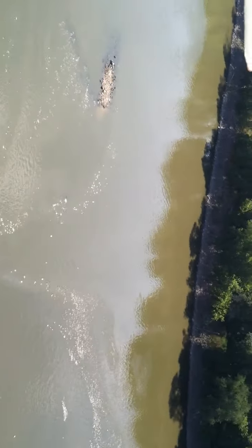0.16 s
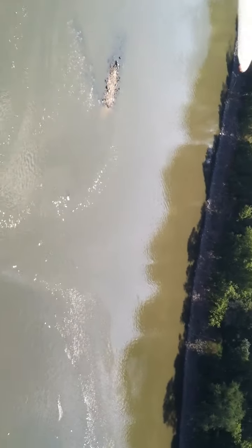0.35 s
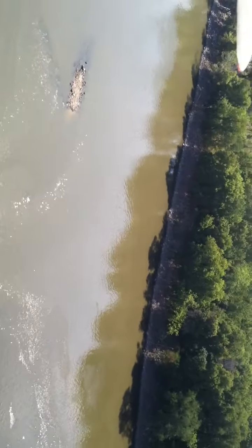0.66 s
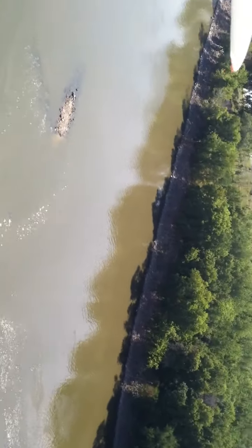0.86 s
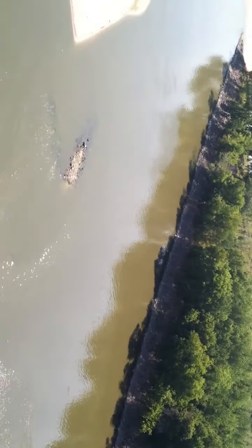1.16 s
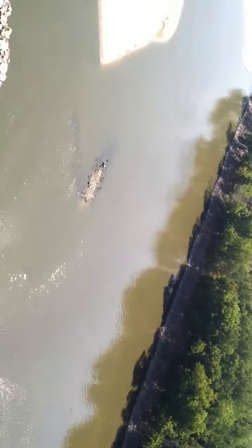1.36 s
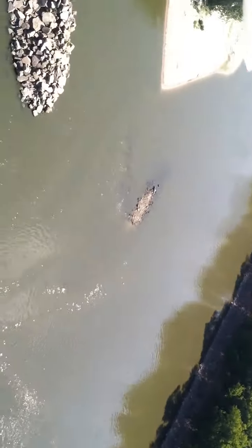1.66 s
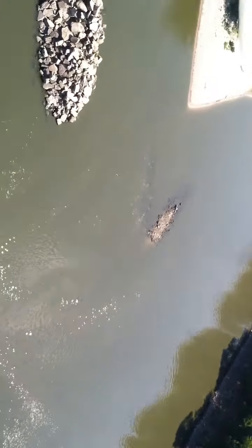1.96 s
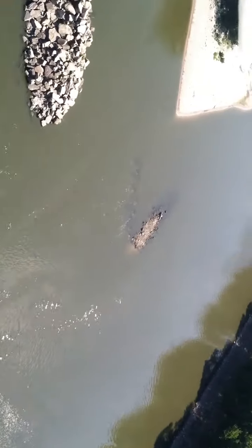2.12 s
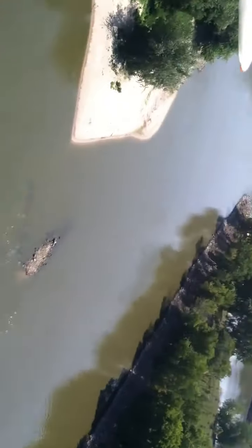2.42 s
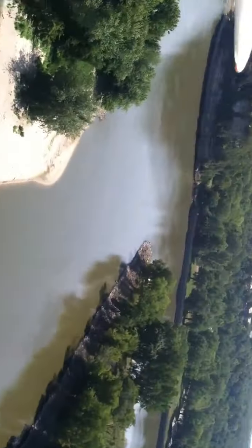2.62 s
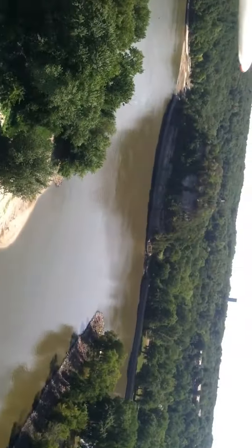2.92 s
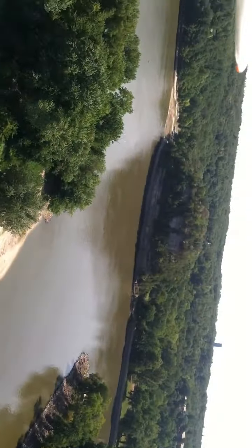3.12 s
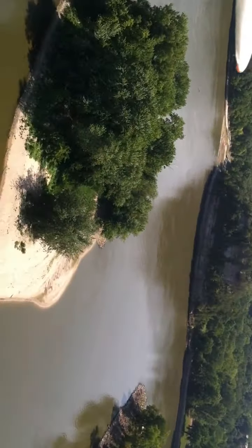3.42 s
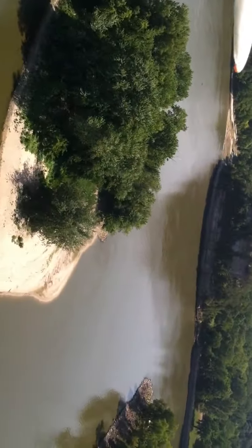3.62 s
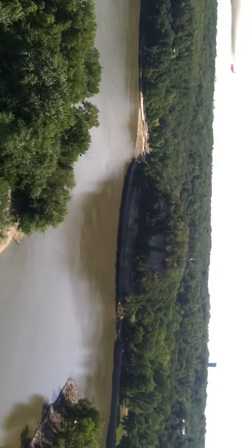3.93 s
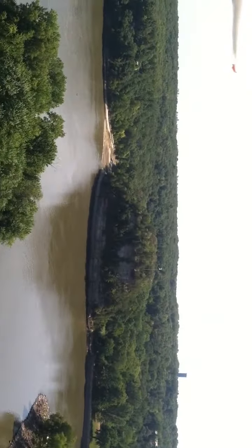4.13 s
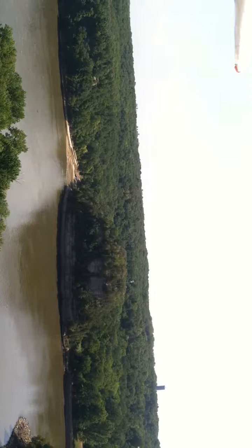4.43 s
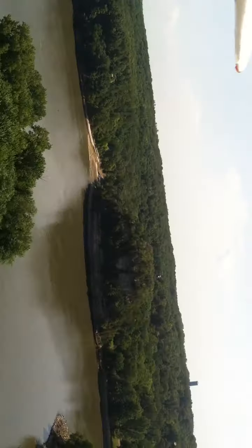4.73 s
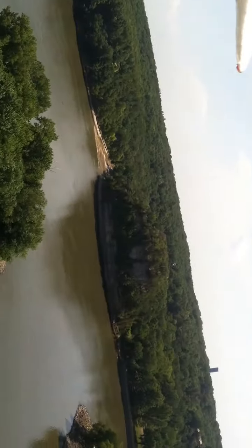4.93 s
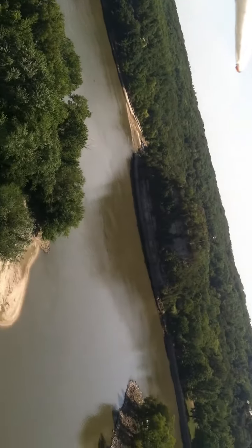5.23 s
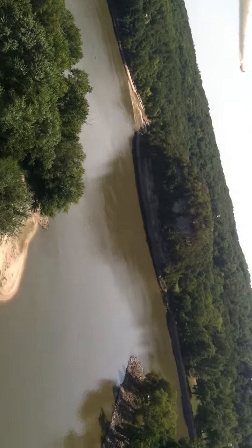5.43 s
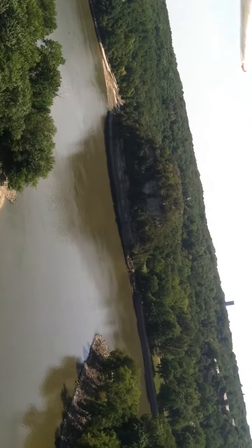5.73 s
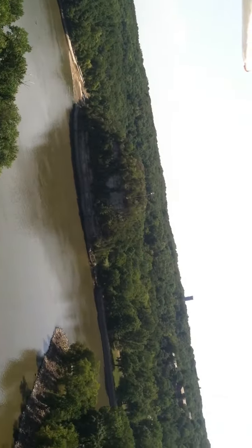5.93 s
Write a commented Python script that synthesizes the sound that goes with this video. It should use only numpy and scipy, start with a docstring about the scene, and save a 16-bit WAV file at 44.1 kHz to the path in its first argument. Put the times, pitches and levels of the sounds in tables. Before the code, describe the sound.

Close to the microphone on a small model glider high over a river, wind roars, flutters and crackles with hard thumps and snaps. A nearby servo begins a rapid, regular ticking buzz with thin gear whirr. The wind gradually calms, then the ticking stops and returns in short bursts with brief whirrs as gusts build again.

```python
"""Air tears past a microphone port on a small model glider: large eddies roar, small ones flutter.
Frozen noise patterns sweep by at an uneven speed; single strong eddies thump and snap.
A control servo nearby answers about 45 command pulses a second with little clicks rung by the case.
Its gears whirr and whine, more when it moves, over the thin hiss of the slipstream.
The microphone cuts the bass, rounds off the peaks and passes nothing above the band limit."""
import sys
import numpy as np
from scipy import signal
from scipy.fft import rfft, irfft, next_fast_len
from scipy.io import wavfile
from scipy.ndimage import map_coordinates

SR = 44100
rng = np.random.default_rng(int(sys.argv[2]) if len(sys.argv) > 2 else 0)


def wav_record(signal):
    """Record a signal, one row per channel, as 16-bit PCM in the file named by sys.argv[1]."""
    frames = np.transpose(np.atleast_2d(signal))
    bounded = np.clip(frames, -1, 1)
    # unit amplitude maps onto the largest positive 16-bit level
    quanta = np.round(bounded * 32767).astype(np.int16)
    wavfile.write(sys.argv[1], SR, quanta)


N = 267755

LOAD_ON_S, EASE_S, LOAD_OFF_S = .78, 2.34, 4.28  # the servo takes a load, eases, lets go


def amp(db):
    """Gain of a level in dB."""
    return 10 ** (np.asarray(db) / 20)


def unit(x):
    """Scaled to rms 1."""
    return x / np.sqrt(np.mean(x ** 2) + 1e-20)


def curves(rows, s):
    """Each column after the time, read at the times s."""
    t, *columns = np.transpose(rows)
    return [np.interp(s, t, column) for column in columns]


def wobble(rate):
    """A smooth random curve, rate knots a second."""
    knots = rng.standard_normal(int(N * rate / SR) + 4)
    return map_coordinates(knots, [np.arange(N) * rate / SR])


def coloured(x, points):
    """x through a causal minimum-phase filter with the (Hz, dB) points as its gain."""
    m = 2 * next_fast_len(len(x) // 2 + 4096)
    hz, db = np.transpose(points)
    gain_db = np.interp(np.log(np.fft.rfftfreq(m, 1 / SR) + 1), np.log(hz + 1), db)
    # folding the cepstrum onto positive time makes the filter causal
    cepstrum = irfft(np.log(amp(gain_db)), m)
    cepstrum[1:m // 2] *= 2
    cepstrum[m // 2 + 1:] = 0
    return irfft(rfft(x, m) * np.exp(rfft(cepstrum)), m)[:len(x)]


# Colour of the slipstream hiss. Each row: frequency in Hz, relative level in dB per Hz.
HISS_COLOUR = [(800, 3), (2000, 12), (3500, 0.5), (6000, -6), (9000, -8.5), (11500, -15.5), (13500, -24),
               (15500, -49)]


def slipstream():
    """The thin hiss of the slipstream: coloured noise that follows its level curve unevenly."""
    hiss_db = curves(AIRFLOW, np.arange(N) / SR)[2]
    hiss = unit(coloured(rng.standard_normal(N), HISS_COLOUR))
    return amp(hiss_db + 0.93 * wobble(40)) * hiss


# Case resonances that colour the gear whirr. Each row: frequency in Hz, relative level in dB per Hz.
WHIRR_COLOUR = [(1500, -26), (2600, -12), (3900, -3.5), (4700, -2), (5300, -10.5), (6200, -13.5),
                (7250, -14.5), (8450, -16), (10000, -23.5), (12500, -27), (15000, -62.5)]
# Narrow whine of the gears. Each row: frequency in Hz, relative level in dB per Hz.
WHINE_COLOUR = [(6500, -39), (7300, -13), (7700, -1), (8000, 1), (8400, -9), (9200, -37)]
# The servo travels and its gears spin up.
# Each row: middle in seconds, half length in seconds, whirr level in dB, whine level in dB.
SERVO_MOVES = [(0.807, 0.027, -58, -70), (2.03, 0.054, -54.5, -67), (2.368, 0.073, -54.5, -70),
               (2.67, .029, -52, -65), (2.808, 0.037, -63, -69), (2.957, 0.043, -57, -65),
               (3.206, 0.049, -51, -60), (3.432, 0.024, -54, -65), (3.68, 0.037, -52, -66),
               (4.49, 0.028, -41, -62), (4.758, 0.045, -66, -70), (4.938, 0.041, -55, -66),
               (5.127, .027, -50, -73), (5.339, 0.036, -41, -58), (5.452, 0.028, -46, -58),
               (5.663, 0.03, -56, -65), (5.89, .03, -62, -69), (6.043, .025, -56, -66)]
WHIRR_DB, IDLE_DB = -58.5, -64.5  # steady whirr until the load is let go, and after it
WHIRR_SAG_DB_PER_S = 1  # the whirr sinks from the easing until the load is let go
WHINE_DB = -13.5  # steady whine against the steady whirr
TOOTH_HZ, TOOTH_DB = 400, 10  # typical tooth contacts a second; how far each contact stands out


def gears():
    """Gear teeth whirr in the case's resonances, and a narrow whine rides on them."""
    t = np.arange(N) / SR
    loaded_db = WHIRR_DB - WHIRR_SAG_DB_PER_S * np.clip(t - EASE_S, 0, None)
    whirr_db = np.where(t < LOAD_OFF_S, loaded_db, IDLE_DB)
    whirr_gain, whine_gain = amp(whirr_db), amp(whirr_db + WHINE_DB)
    for s, half_s, move_whirr_db, move_whine_db in SERVO_MOVES:
        whirr_gain = whirr_gain + amp(move_whirr_db) * np.exp(-((t - s) / half_s) ** 2)
        # the whine swells and fades more slowly than the whirr
        whine_gain = whine_gain + amp(move_whine_db) * np.exp(-((t - s) / (1.4 * half_s)) ** 2)
    whine = unit(coloured(rng.standard_normal(N) * amp(3.5 * wobble(90)), WHINE_COLOUR))
    mesh = np.cos(2 * np.pi * np.cumsum(TOOTH_HZ * amp(1.7 * wobble(30))) / SR)
    contact = amp(TOOTH_DB * mesh + 1.5 * wobble(150))
    teeth = unit(coloured(rng.standard_normal(N) * contact, WHIRR_COLOUR))
    return whirr_gain * teeth + whine_gain * whine


# The servo holds a load. Each row: time in seconds, stop click level in dB,
# start click level in dB against the stop, drive pulse length in ms.
HELD_LOAD = [(.78, -35, -2, 1), (1.15, -32, -2, 1.05), (1.45, -31, -3, 2.05), (2.3, -31, -3, 2.05),
             (2.5, -31, -3, 1.9), (4.28, -27, -3, 1.9)]
FRAME_S = .021996  # from one command pulse to the next
DELAY_S, EARLY_S = .00635, .0002  # stop click after the frame start; how early it stops at first
SKIP_DB, SKIP_END_S = -9, 4.2  # from EASE_S to here every second frame is weak


def held_clicks():
    """Stop times, lateness, stop levels, start levels and pulse lengths while the motor holds the load."""
    frame = np.arange(round(LOAD_ON_S / FRAME_S), round(LOAD_OFF_S / FRAME_S))
    frame_s = frame * FRAME_S
    stop_db, start_db, pulse_ms = curves(HELD_LOAD, frame_s)
    chance = rng.standard_normal((len(frame), 3))
    # the skipped frames vary the most, and all are uneven until the load settles
    skip_db = SKIP_DB * (frame_s > EASE_S) * (frame_s < SKIP_END_S) * (frame % 2)
    skip_db = skip_db * np.clip(1 + .4 * chance[:, 0], .3, 2)
    uneven_db = .8 + 3 * np.exp((LOAD_ON_S - frame_s) / .6)
    db = stop_db + skip_db + uneven_db * chance[:, 1]
    # the first pulses are the shortest and stop early
    s = frame_s + DELAY_S - EARLY_S * np.exp((LOAD_ON_S - frame_s) / .4)
    late_s = .00007 * chance[:, 2]
    return s, late_s, db, start_db, pulse_ms


# Short bursts of drive pulses once the load is off.
# Each row: rough stop time in seconds, stop click level in dB.
TWITCH_PULSES = [(4.4523, -40), (4.4703, -22), (4.5576, -21.5), (4.5801, -19), (4.624, -24), (4.8874, -21),
                 (4.9103, -24.5), (4.9323, -22.5), (4.9542, -23.5), (5.0206, -20.5), (5.042, -22.5),
                 (5.0635, -25), (5.0859, -23.5), (5.1079, -23.5), (5.2625, -23), (5.285, -23.5),
                 (5.3069, -21), (5.3299, -20.5), (5.3508, -20.5), (5.4162, -25), (5.4381, -25),
                 (5.4601, -23), (5.481, -21.5), (5.503, -20), (5.5249, -20.5), (5.6367, -24), (5.6581, -23),
                 (5.6801, -21.5), (5.7245, -20.5), (5.7449, -23), (5.7903, -22), (5.8781, -25),
                 (5.922, -22), (6.0323, -21.5)]
LOOSE_MS = .7, 1.9  # shortest and longest twitch pulse


def twitch_clicks():
    """The same for twitch pulses, which fall near the stop time of the nearest frame."""
    rough_s, db = np.transpose(TWITCH_PULSES)
    count = len(rough_s)
    s = np.round((rough_s - DELAY_S) / FRAME_S) * FRAME_S + DELAY_S
    s = s + .0002 * rng.standard_normal(count)
    start_db = -7 + 3 * rng.standard_normal(count)
    return s, np.zeros(count), db, start_db, rng.uniform(*LOOSE_MS, count)


# Faint stray ticks of the linkage. Each row: time in seconds, level in dB.
LINKAGE_TICKS = [(0.0268, -30), (0.051, -33), (0.212, -33), (0.282, -44), (0.4229, -33), (0.4936, -30),
                 (0.656, -31), (0.7512, -39)]
# Click through the airframe. Each row: frequency in Hz, gain in dB.
AIRFRAME = [(1200, -18), (2200, -5.5), (2900, -3.5), (3550, 3), (4700, 0), (5400, -10), (6400, -20.5),
            (7300, -18), (8200, -19), (10500, -24), (13000, -45.5)]
# Higher ring of a stop click. Each row: frequency in Hz, gain in dB.
STOP_RING = [(2500, -24.5), (4000, -11), (4750, 2), (5200, -5), (5650, -24), (8000, -21.5), (9500, -25),
             (12000, -38)]
EDGE_DB, EDGE_GROWS = -26.5, .75  # ring of the strongest stop; dB gained for each dB of the stop


def servo():
    """The motor clicks as a drive pulse starts and, harder, when it stops a millisecond or two later."""
    s, late_s, db, start_db, pulse_ms = map(np.concatenate, zip(held_clicks(), twitch_clicks()))
    # under load the end of a pulse wavers while its start does not
    stop = np.round((s + late_s) * SR).astype(int)
    start = np.round((s - pulse_ms / 1000) * SR).astype(int)
    kicks = np.zeros(N)
    np.add.at(kicks, stop, amp(db))
    np.add.at(kicks, start, amp(db + start_db))
    # each stop also rings a higher resonance, which weak stops keep most of
    edges = np.zeros(N)
    edge_db = EDGE_DB + EDGE_GROWS * (db - db.max()) + 1.5 * rng.standard_normal(len(s))
    np.add.at(edges, stop, amp(edge_db))
    tick_s, tick_db = np.transpose(LINKAGE_TICKS)
    kicks[np.round(tick_s * SR).astype(int)] += amp(tick_db)
    # two short echoes inside the fuselage, and the gears rebound
    for lag_s, echo_db in [(.00065, -11), (.00155, -14), (.006, -22)]:
        kicks = kicks + amp(echo_db) * np.roll(kicks, round(lag_s * SR))
    # the gear train rattles on for a few milliseconds, so no two clicks ring alike
    fading = amp(-60 * np.arange(800) / SR / 0.0095)
    rattle = amp(-29) * np.convolve(kicks, fading)[:N] * rng.standard_normal(N)
    # the peak of one click through the airframe sets the scale
    crest = np.abs(coloured(np.arange(512) == 0, AIRFRAME)).max()
    return (coloured(kicks + rattle, AIRFRAME) + coloured(edges, STOP_RING)) / crest


def eddies(s, db, hz, cycles):
    """Each eddy is about one cycle of pressure under a pointed crest, mostly a suction."""
    t = np.arange(-300, 300) / SR
    turn = .5 + .15 * rng.standard_normal(len(s))[:, None]  # half a turn is pure suction
    phase = hz[:, None] * t
    shape = amp(db)[:, None] * np.cos(2 * np.pi * (phase + turn)) / np.cosh(phase / cycles)
    place = np.round(s * SR).astype(int)[:, None] + np.arange(600)
    return np.bincount(place.ravel(), shape.ravel(), N + 600)[300:N + 300]


# Single strong eddies, from thumps to snaps.
# Each row: time in seconds, crest level in dB before its random turn, pitch in Hz.
STRONG_EDDIES = [(0.0429, -3, 820), (.062, -7.5, 945), (.13, -11.5, 950), (.2045, -12, 1050),
                 (.234, -4, 950), (.26, -7, 1000), (.2867, -3.5, 1300), (0.3103, 0, 1170),
                 (.3162, -4.5, 1330), (.331, -11, 1010), (0.335, -15, 895), (.362, -5, 423),
                 (.39, -5.5, 1100), (0.3921, 0.5, 437), (.409, -8, 800), (.4296, -12, 940),
                 (.4358, -10, 895), (0.5119, -8, 980), (0.5153, -9.5, 1000), (.5271, -2, 464),
                 (.5353, -6, 1000), (.541, -9, 1210), (0.5638, -7, 1150), (.576, -5, 800), (.608, -10, 900),
                 (.614, -9, 900), (0.6352, -4.5, 1360), (0.6532, -3.5, 1160), (0.6562, 1.5, 587),
                 (.662, -8, 900), (.6849, -13, 900), (0.705, -3, 452), (0.7547, -6.5, 600),
                 (.7789, -13, 950), (0.724, -14.5, 1110), (.7832, -7, 890), (0.798, -15, 980),
                 (0.8331, -7, 1690), (0.8553, -4, 1150), (0.872, 0, 417), (0.9021, -3, 1060),
                 (.9062, -2.5, 885), (0.9585, -6.5, 935), (0.9681, -1, 840), (1.0003, -9.5, 950),
                 (1.0124, -12, 990), (1.0179, -9.5, 1500), (1.0249, -9, 1310), (1.0392, -3, 1120),
                 (1.0427, -13, 1150), (1.0535, -2, 452), (1.1102, -9, 1000), (1.1168, -14, 1100),
                 (1.1219, -8.5, 1100), (1.1313, -8, 430), (1.158, -11.5, 450), (1.171, -0.5, 645),
                 (1.181, -3, 1160), (1.198, -12, 796), (1.206, -10.5, 850), (1.218, -17, 900),
                 (1.2432, -8.5, 940), (1.2642, 0.5, 1030), (1.283, -10, 1010), (1.2946, -12, 890),
                 (1.378, -15.5, 795), (1.3944, -17, 850), (1.449, -1.5, 705), (1.4521, -17, 700),
                 (1.4579, -1, 400), (1.468, -9, 400), (1.4804, -7.5, 656), (1.537, -8, 500),
                 (1.5485, -14, 800), (1.6005, -23, 950), (1.6498, -11.5, 960), (1.675, -10.5, 1080),
                 (1.6818, -3.5, 440), (1.7463, -9, 746), (1.8543, -15, 900), (1.9198, -10.5, 755),
                 (1.9463, -6, 600), (1.9632, -0.5, 400), (1.9955, -11, 600), (2.0482, -12, 950),
                 (2.084, -22, 850), (2.0967, -9.5, 900), (2.1268, -15, 840), (2.1421, -4.5, 685),
                 (2.1463, -13, 940), (2.235, -11, 860), (2.2798, -4.5, 1080), (2.2857, -5.5, 530),
                 (2.3186, -9.5, 470), (2.3215, 0.5, 850), (2.3258, -14, 800), (2.3284, -13, 1000),
                 (2.3805, -11, 836), (2.388, -16, 800), (2.419, -9, 890), (2.4447, -14, 940),
                 (2.458, -10.5, 1090), (2.4685, -10, 900), (2.508, -4, 500), (2.521, -12, 800),
                 (2.544, -10.5, 1000), (2.567, -14, 900), (2.601, -13, 900), (2.6175, -9.5, 930),
                 (2.666, -8.5, 400), (2.6847, -16, 850), (2.731, -12, 800), (2.7821, -10.5, 890),
                 (2.87, -12.5, 400), (2.8939, -10, 820), (2.9599, -18.5, 945), (3.093, -13, 875),
                 (3.1267, -11, 403), (3.1416, -10.5, 800), (3.175, -8, 350), (3.2555, -21, 900),
                 (3.5296, -8, 464), (3.559, -10, 300), (3.787, -13, 400), (3.836, -12, 400),
                 (3.862, -8.5, 292), (3.906, -20, 350), (3.986, -16, 400), (4.088, -15, 400),
                 (4.136, -14.5, 400), (4.342, -13, 400), (4.405, -21, 400), (4.7727, -14, 600),
                 (5.0871, -15.5, 850), (5.1961, -5.5, 322), (5.2207, -15, 650), (5.4101, -16, 653),
                 (5.4496, -20, 650), (5.5555, -3.5, 490), (5.5618, -13, 790), (5.642, -19, 700),
                 (5.6863, -0.5, 490), (5.7032, -12, 500), (5.7335, -13, 750), (5.7462, -5, 430),
                 (5.7737, -7, 706), (5.8265, -14.5, 800), (5.8833, -8, 714), (5.89, -9, 450),
                 (5.9287, 0.5, 536), (5.9325, -6.5, 447), (5.962, -8, 750), (5.9665, -19.5, 750),
                 (6.002, -9, 804), (6.0295, -6, 423), (6.0335, -1, 437), (6.0564, -10, 650),
                 (6.0601, -17, 470)]
THUMP_RINGS = 0.46  # lower eddies last more cycles: power of the pitch ratio to 1 kHz
CRACKLE_DB, CRACKLE_GROWS = -24, 3.9  # base level at normal speed; dB gained for each dB of speed


def snaps():
    """The strong single eddies, each with three lesser ones close around it."""
    s, db, hz = np.transpose(STRONG_EDDIES)
    strong = eddies(s, db, hz, cycles=0.19 * (1000 / hz[:, None]) ** THUMP_RINGS)
    near = np.clip(rng.standard_normal((len(s), 3, 3)), -1.5, 1.5)
    train_s = np.clip(s[:, None] + .001 + 0.00409 * near[:, 0], 0, (N - 1) / SR)
    train_db = db[:, None] - 12 + 3 * near[:, 1]
    train_hz = hz[:, None] * amp(-2.0 + 2.9 * near[:, 2])
    return strong + eddies(train_s.ravel(), train_db.ravel(), train_hz.ravel(), cycles=0.16)


def crackle():
    """1200 small eddies at random times, much louder in fast air; a few stand well above the rest."""
    chance = rng.random((1200, 3))
    s = chance[:, 0] * N / SR
    speed_db = curves(AIRFLOW, s)[1]
    db = CRACKLE_DB + CRACKLE_GROWS * speed_db - 2.83 * np.log(0.013 + chance[:, 1])
    return eddies(s, db, 600 * amp(5.0 * chance[:, 2]), cycles=0.16)


def swell(half_s):
    """Near 1 around a strong eddy, 0 in the lulls between them."""
    near = np.bincount(np.round(np.transpose(STRONG_EDDIES)[0] * SR).astype(int), minlength=N)
    t = np.arange(-SR // 10, SR // 10) / SR
    return np.tanh(signal.fftconvolve(near, np.exp(-(t / half_s) ** 2), "same"))


def swept(spectrum, speed_db, loud, slow_db=0):
    """A frozen eddy pattern carried past the port: faster air is higher and louder."""
    pattern = coloured(rng.standard_normal(2 * N), spectrum)
    place = np.cumsum(amp(speed_db + slow_db) / np.mean(amp(speed_db)))
    return unit(amp(loud * speed_db) * map_coordinates(pattern, [place]))


# The airflow. Each row: time in seconds, base level of the large-eddy roar in dB,
# air speed at the port in dB, base level of the slipstream hiss in dB.
AIRFLOW = [(0, -17.5, 0, -47.5), (.15, -15.5, -.5, -45), (.4, -12.5, 1, -45), (.7, -16.5, 1, -47.5),
           (.95, -14.5, 0.77, -49), (1.2, -15.5, 1, -44), (1.38, -16.5, 0, -45.5), (1.46, -14, -0.5, -46),
           (1.62, -17, -0.21, -45.5), (1.89, -17, -.5, -46.5), (1.95, -14, 0, -45),
           (2.065, -17.5, 0, -48.5), (2.14, -14, 0.5, -48.5), (2.32, -15.5, 0.23, -51),
           (2.5, -18, -.5, -52.5), (2.95, -21, -2, -52.5), (3.55, -17, -1.67, -50),
           (3.9, -22.5, -3.5, -55.5), (4.5, -19.5, -2.5, -54), (5.5, -19, -3, -49), (5.75, -17, -2.5, -47),
           (6.07, -15.5, -2, -47.5)]
# Large eddies at steady speed. Each row: frequency in Hz, relative level in dB per Hz.
LARGE_EDDIES = [(40, -15), (100, 0.5), (200, -2), (330, -3.5), (500, -9), (800, -16.5), (1500, -33),
                (3000, -83)]
# Small eddies at steady speed. Each row: frequency in Hz, relative level in dB per Hz.
SMALL_EDDIES = [(150, -33), (350, -2), (600, 0.5), (1000, -9), (1500, -18.5), (2200, -29.5), (3500, -40),
                (6000, -78)]
SMALL_DB, SMALL_GROWS = -29.5, 3  # base level at normal speed; dB gained for each dB of speed
SWELL_DB, ROAR_SWELL_DB = 5, 2.5  # rise of the small eddies and of the roar around a strong eddy


def wind():
    """Large eddies roar; small ones feel the quick changes of speed and flutter."""
    large_db, speed_db, _ = curves(AIRFLOW, np.arange(N) / SR)
    small_db = SMALL_DB + SMALL_GROWS * speed_db + SWELL_DB * swell(half_s=0.0035) + 1.4 * wobble(14)
    # fast air is also the less even
    gusts = unit(.3 * wobble(25) + .8 * wobble(70) + .6 * wobble(200))
    surge = amp(1.5 * speed_db) * gusts
    roar_db = large_db + ROAR_SWELL_DB * swell(half_s=0.0036) + 0.73 * wobble(12)
    roar = amp(roar_db) * swept(LARGE_EDDIES, .8 * surge + 0.4095 * wobble(40), loud=0.57)
    flutter = amp(small_db) * swept(SMALL_EDDIES, 1.4 * surge, loud=0.046, slow_db=speed_db)
    return roar + flutter


def scene():
    """All sources meet at one port."""
    return (slipstream() + gears() + servo() + snaps() + crackle() + wind())[None]


# Microphone bass cut. Each row: frequency in Hz, gain in dB.
BASS_CUT = [(25, -6), (50, -18.5), (80, -20.5), (120, -8.5), (160, -1.5), (220, 0)]
CEILING = .72  # full scale is 1
COUPLING_HZ = 75  # the stage after the ceiling drops the deepest bass
TOP_HZ = 15600  # band limit


def record(dry):
    """A bass cut, a soft ceiling, a coupling high-pass, and nothing above the band limit."""
    x = coloured(dry[0], BASS_CUT)
    x = x / (1 + np.abs(x / CEILING) ** 5) ** (1 / 5)
    m = next_fast_len(N + 4096)
    hz = np.fft.rfftfreq(m, 1 / SR)
    high_pass = hz ** 2 / np.hypot(hz ** 2, COUPLING_HZ ** 2)
    return irfft(rfft(x, m) * (hz < TOP_HZ) * high_pass, m)[None, :N]


dry = scene()
out = record(dry)
wav_record(out)
```